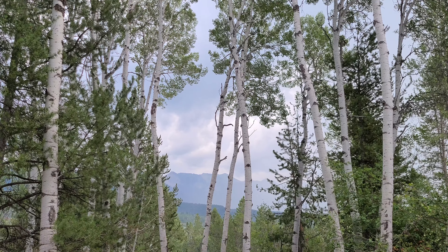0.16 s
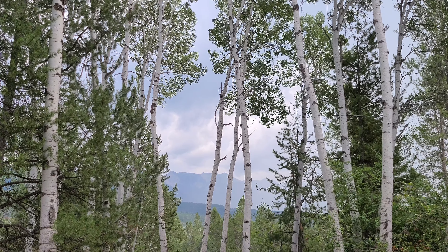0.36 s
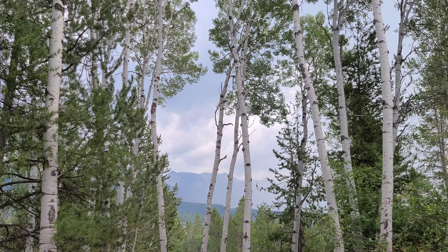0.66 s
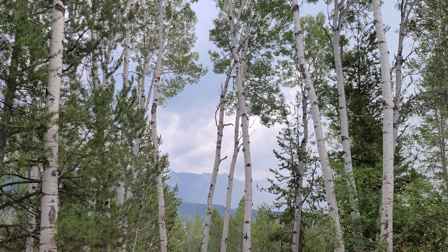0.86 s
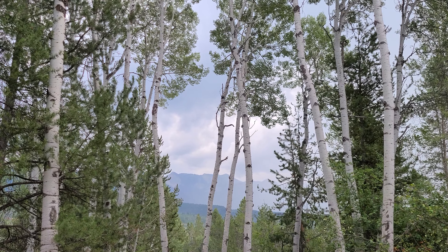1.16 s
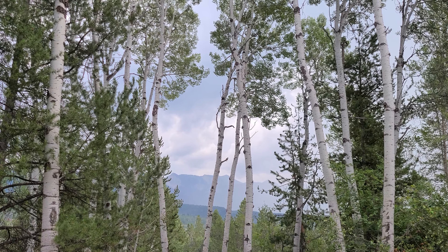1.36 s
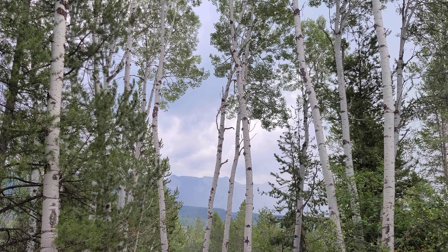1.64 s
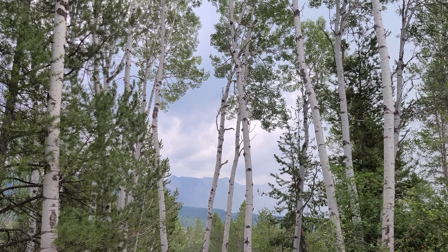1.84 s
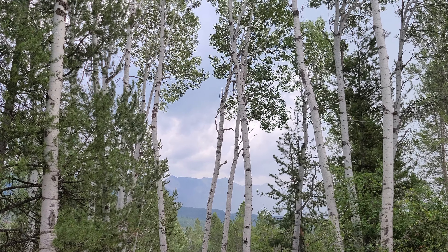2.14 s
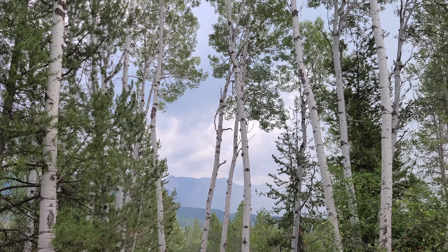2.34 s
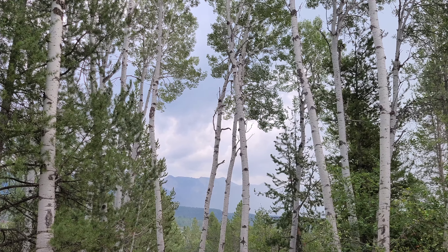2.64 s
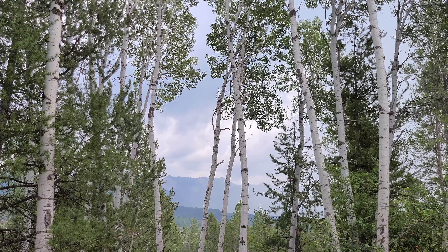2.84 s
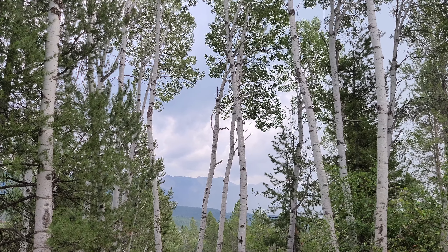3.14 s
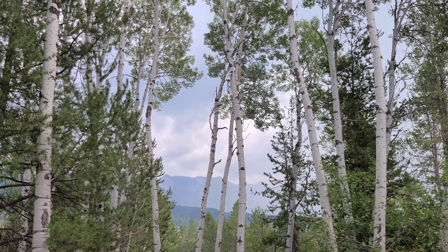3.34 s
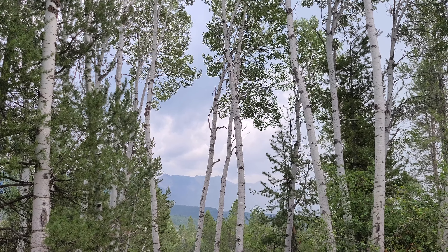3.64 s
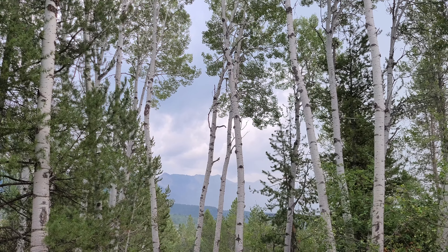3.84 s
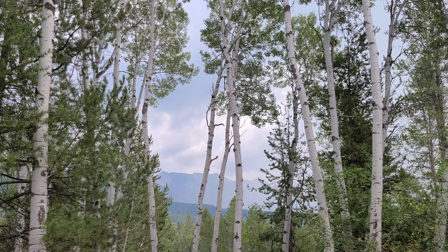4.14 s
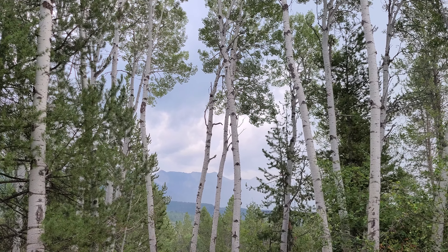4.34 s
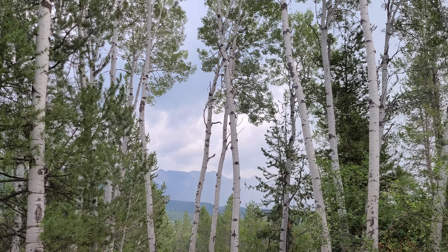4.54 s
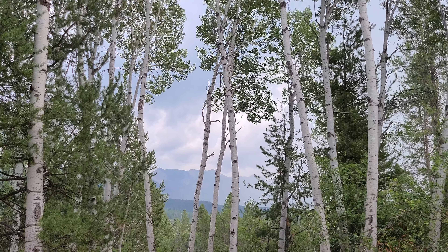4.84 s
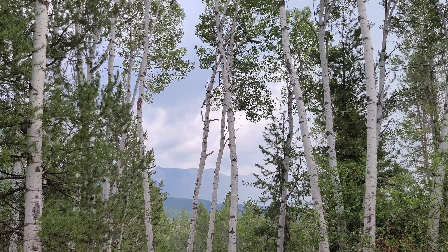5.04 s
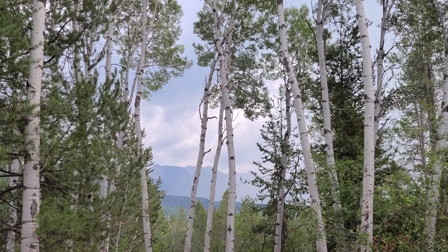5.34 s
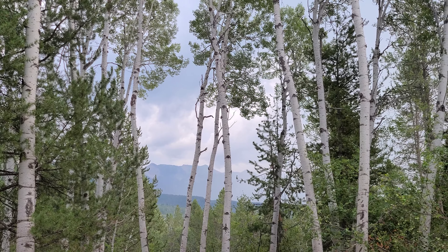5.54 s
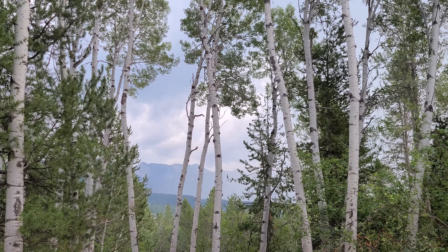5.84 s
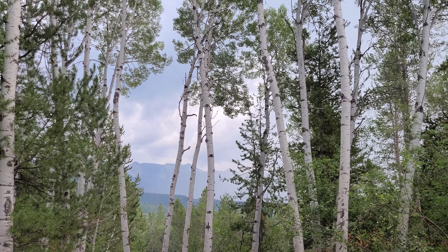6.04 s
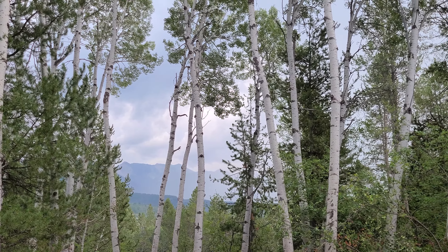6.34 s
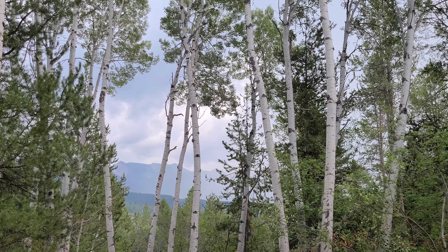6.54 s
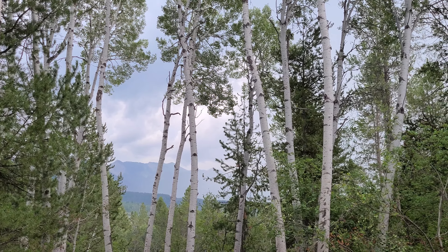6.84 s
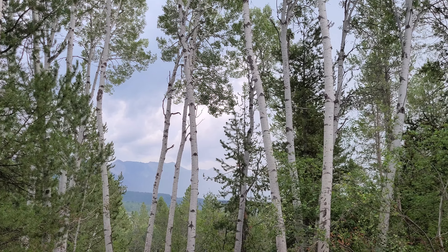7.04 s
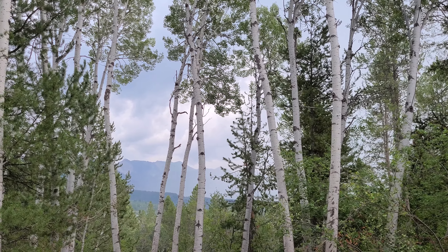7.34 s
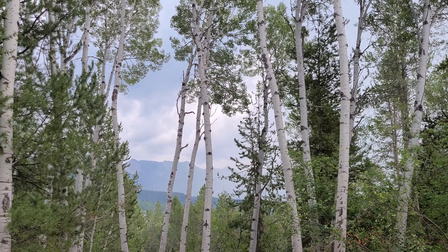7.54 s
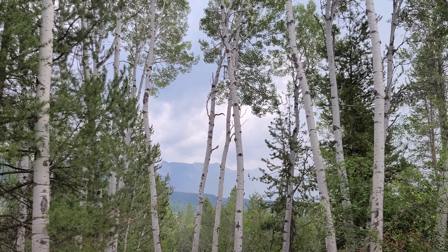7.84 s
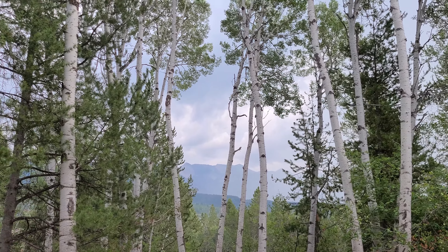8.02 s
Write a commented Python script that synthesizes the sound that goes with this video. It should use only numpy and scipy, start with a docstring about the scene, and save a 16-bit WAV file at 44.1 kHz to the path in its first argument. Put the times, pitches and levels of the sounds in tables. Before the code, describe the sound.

Outdoors in a wooded mountain valley, thunder is already rumbling. Close to the microphone something rubs quickly to and fro for about two seconds, with small rasping snags. The thunder builds into dull cracking claps, peaking around three seconds, sinks to a mutter, then swells again in a deeper, bassier peal before fading. Faint airy hiss lies behind, and the trees lend a short, diffuse echo.

```python
"""Distant thunder rolls over a mountain forest in two long peals, the first cracking, the second deep.
Shock waves from the crooked channel superpose into a steady rumble, surges and single claps,
each a crowd or train of filtered impulses, dulled by the air and scattered by the trees.
At first something rubs softly to and fro close to the microphone: impulses of stick-slip friction
drive resonances and a broad swish. Behind lies a quiet hiss of filtered noise."""
import sys
import numpy as np
from scipy import signal
from scipy.fft import rfft, irfft
from scipy.io import wavfile
from scipy.ndimage import uniform_filter1d, minimum_filter1d, map_coordinates

SR = 44100
rng = np.random.default_rng(int(sys.argv[2]) if len(sys.argv) > 2 else 0)


def to_wav(s):
    """Save 16-bit WAV."""
    ch = np.atleast_2d(s).T  # columns
    pcm = np.round(np.clip(ch, -1, 1) * 32767)  # PCM
    wavfile.write(sys.argv[1], SR, pcm.astype(np.int16))


N = 360738
TIME = np.arange(N) / SR  # s
FREQ = np.arange(N // 2 + 1) * SR / N  # Hz


def undb(db):
    """Logarithmic level: decibels to amplitude gain."""
    return 10 ** (np.asarray(db) / 20)


def unit(x):
    """Normalisation of power: scale to rms 1."""
    return x / np.sqrt(np.mean(x ** 2))


def curves(table):
    """Linear interpolation: the columns of a table, joined by straight lines in time."""
    s, *columns = np.transpose(table)
    return [np.interp(TIME, s, column) for column in columns]


def colour(x, points):
    """Minimum-phase filtering: a causal filter through (Hz, dB) points, from the cepstrum of its gain."""
    n = x.shape[-1]
    bin_hz = np.arange(n // 2 + 1) * SR / n
    hz, db = np.transpose(points)
    gain_db = np.interp(np.log(bin_hz + 1), np.log(hz), db)
    cepstrum = irfft(np.log(undb(gain_db)), n)
    # folding the cepstrum onto positive times makes the response causal
    cepstrum[1:n // 2] *= 2
    cepstrum[n // 2 + 1:] = 0
    return irfft(rfft(x) * np.exp(rfft(cepstrum)), n)


def split(x, hz, order=8):
    """Complementary filtering: the parts of x below and above hz add up to x."""
    n = x.shape[-1]
    bin_hz = np.arange(n // 2 + 1) * SR / n
    low = irfft(rfft(x) / (1 + (bin_hz / hz) ** order), n)
    return low, x - low


def registers(x):
    """Band division: bass, body and crack of a thunder sound, parted at 110 and 400 Hz."""
    bass, rest = split(x, 110)
    body, crack = split(rest, 400)
    return bass, body, crack


def resonance(hz, width_hz):
    """Resonance: response of a steep band-pass, gain near 1 at its centre."""
    detuning = (FREQ ** 2 - hz ** 2) / (0.72 * width_hz * FREQ + 1)
    return 1 / (1 + 1j * detuning) ** 2


def impulses(n, rate, spread_db):
    """Shot noise: randomly timed impulses of either sign, rate per second, sizes spread exponentially in dB."""
    size = undb(spread_db * np.minimum(rng.exponential(size=n), 4))
    present = rng.random(n) < rate / SR
    return present * rng.choice([-1, 1], n) * size


def running_rms(x, seconds):
    """Short-time power: level of x over a sliding, rounded window."""
    k = max(int(seconds * SR), 2)
    power = uniform_filter1d(uniform_filter1d(x ** 2, k), k)
    return np.sqrt(np.abs(power) + 1e-18)


def delay(x, ms):
    """Propagation delay: x heard ms later; the lag may move."""
    return map_coordinates(x, [np.arange(N) - ms * SR / 1000], order=3, mode="nearest")


def flutter(rate):
    """Random modulation: levels held 1 / rate s and slewed; rms near 1."""
    k = int(SR / rate)
    held = np.repeat(rng.standard_normal(N // k + 1), k)
    return unit(uniform_filter1d(held, k))[:N]


# rubbing strokes, to and fro, about three a second; levels before the trims in rubbing():
# (start [s], length [s], rasp level [dB], swish level [dB], thin ring level [dB])
STROKES = [(-0.2, 0.35, -58, -61.5, -76), (0.096, 0.34, -58, -59.5, -80), (0.44, 0.41, -57, -60.5, -64),
           (0.786, 0.31, -52, -58, -76), (1.132, 0.35, -50.5, -57, -55), (1.441, 0.28, -55.5, -58, -77),
           (1.76, 0.34, -62, -62, -64), (2.061, 0.31, -53.5, -56, -90)]
# snags, where the rubbed thing catches and rasps for a moment: (time [s], rasp level before trim [dB])
SNAGS = [(0.17, -52.5), (0.26, -48.5), (0.57, -56), (0.73, -55), (0.86, -58), (0.94, -57), (1.17, -60.5),
         (1.41, -61), (1.88, -53), (2.029, -56.5), (2.16, -45.5), (2.465, -68)]
SNAG_S = 0.016
# each part of the sound grows as this power of the stroke's speed
RASP_POWER, SWISH_POWER, RING_POWER = 2.5, 3, 6.3


def strokes(skew=0.97):
    """Velocity-dependent friction: each stroke speeds up from rest and slows, its gains powers of speed; snags add rasp."""
    speed, gains = np.zeros(N), np.zeros((3, N))
    powers = (RASP_POWER, SWISH_POWER, RING_POWER)
    for start_s, length_s, *levels_db in STROKES:
        along = (TIME - start_s) / length_s
        moving = (along > 0) & (along < 1)
        arc = np.sin(np.pi * along[moving] ** skew)
        speed[moving] += arc
        gains[:, moving] += [undb(db) * arc ** power for db, power in zip(levels_db, powers)]
    rasp, swish, ring = gains
    snags = sum(undb(db) * np.exp(-((TIME - s) / SNAG_S) ** 2) for s, db in SNAGS)
    return speed, np.hypot(rasp, snags), swish, ring


# resonances of the rubbed thing: (frequency [Hz], width [Hz], relative level [dB])
RASP_MODES = [(2574, 330, -0.5), (3054, 240, -2.5)]
SCRAPE_HZ, SCRAPE_WIDTH_HZ = 1640, 520
RING_HZ, RING_WIDTH_HZ = 10150, 250
# colour of a fast stroke: (frequency [Hz], relative level [dB])
SWISH_SPECTRUM = [(1200, -6.5), (2000, -4), (2600, 5), (3200, 11), (3560, -3), (4150, 1), (4850, -5),
                  (5230, -15.5), (5600, -3.5), (7000, -13), (7600, -17), (10000, -15.5), (12500, -25),
                  (15500, -19)]


def rubbing(lag_ms=0.436, stray_db=-3, rasp_stray_db=-12, catch_db=2.0, swap_db=1.5, brighten_db=6,
            rasp_trim_db=-1.0, swish_trim_db=5.5, scrape_db=4, ring_trim_db=-4.0):
    """Stick-slip friction: slips drive two resonances; mid-stroke opens into a swish, the way back has a thin ring."""
    speed, rasp_gain, swish_gain, ring_gain = strokes()
    catch = catch_db * flutter(110)
    # the contact wanders, so either resonance may take the lead; speed favours the upper one
    modes = []
    for k, (hz, width_hz, db) in enumerate(RASP_MODES):
        lead_db = swap_db * flutter(35) + k * brighten_db * (speed - 1)
        modes.append((resonance(hz, width_hz), db + lead_db))
    rasps, swishes = [], []
    # one sound common to both ports, then a stray one for each
    for _ in range(3):
        grains = rfft(impulses(N, rate=1900, spread_db=2.0))
        slips = rfft(impulses(N, rate=1200, spread_db=-0.5))
        rasp = sum(unit(irfft(slips * mode, N)) * undb(level_db) for mode, level_db in modes)
        rasp = rasp * rasp_gain * undb(rasp_trim_db + catch)
        # the fastest part of a stroke brings out the lower scrape
        scrape = unit(irfft(slips * resonance(SCRAPE_HZ, SCRAPE_WIDTH_HZ), N))
        scrape = scrape * speed ** 3.1 * swish_gain * undb(scrape_db)
        swish = unit(colour(irfft(grains, N), SWISH_SPECTRUM))
        swish = swish * swish_gain * undb(swish_trim_db + .5 * catch)
        ring = unit(irfft(grains * resonance(RING_HZ, RING_WIDTH_HZ), N))
        ring = ring * ring_gain * undb(ring_trim_db + catch)
        rasps.append(rasp + scrape)
        swishes.append(swish + ring)
    direct = rasps[0] + swishes[0]
    stray = undb(rasp_stray_db) * np.array(rasps[1:]) + undb(stray_db) * np.array(swishes[1:])
    return np.array([direct, delay(direct, lag_ms)]) + stray


# spectral density of still forest air: (frequency [Hz], relative level [dB per Hz])
AIR_SPECTRUM = [(650, -27), (1100, 0), (1260, -4.5), (1450, -2.5), (1570, -6), (1850, -9), (2000, -10.5),
                (2580, -15.5), (2850, -15), (3080, -17), (4590, -19.5), (4950, -22.5), (6610, -17),
                (8240, -26.5), (15500, -33.5)]
AIR_DB = -68  # rms of the hiss above 1500 Hz


def air():
    """Incoherent noise: a smooth far hiss, unrelated at the two ports."""
    hiss = colour(rng.standard_normal((2, N)), AIR_SPECTRUM)
    treble = split(hiss, 1500)[1]
    return hiss * undb(AIR_DB) / np.std(treble)


SURGE_ATTACK_S, SURGE_FALL_DB_PER_S = 0.016, 217


def surge(start_s, hold_s):
    """Exponential decay: a surge's envelope rises quickly, holds, then falls steadily in dB."""
    age = TIME - start_s
    rise = np.clip(age / SURGE_ATTACK_S + .5, 0, 1)
    return rise * undb(-SURGE_FALL_DB_PER_S * np.clip(age - hold_s, 0, 1))


# the rumble that lies under the whole roll: (time [s], body level before trim [dB])
ROLL = [(0, -30), (0.36, -37), (0.83, -38.5), (0.95, -24.5), (1.3, -26), (1.7, -42), (1.98, -34),
        (2.4, -31), (2.75, -25), (3.3, -29.5), (3.95, -37), (4.4, -40.5), (5.2, -38.5), (5.5, -25.5),
        (6.0, -25.5), (6.5, -39.5), (7.3, -39), (7.8, -45), (8.18, -46)]
# bass and crack of the rumble against its body; later sound has come further and is deeper
RUMBLE_BASS_DB, DEEPENING_DB_PER_S, RUMBLE_CRACK_DB = -2.5, 1.02, -10.5
# surges, each a bend of the channel heard as one crowd of shocks; levels before trim:
# (start [s], hold [s], body level [dB], bass level [dB], crack level [dB])
SURGES = [(0.067, 0.014, -43, -42, -48), (0.218, 0.036, -33, -28.5, -40.5),
          (0.4, 0.06, -33.5, -31.5, -43.5), (0.57, 0.14, -37, -34, -49), (0.85, 0.13, -24.5, -26.5, -39.5),
          (1.14, 0.14, -20, -27.5, -34.5), (1.488, 0.11, -20.5, -31.5, -33.5),
          (1.585, 0.094, -33.5, -23.5, -37), (1.724, 0.16, -30.5, -33.5, -39.5),
          (2.041, 0.032, -22, -27.5, -41.5), (2.139, 0.12, -27.5, -26, -44.5),
          (2.341, 0.19, -21, -25, -32.5), (2.487, 0.16, -20, -18.5, -29), (2.831, 0.054, -21, -30, -27.5),
          (2.912, 0.1, -17.5, -25.5, -29), (3.459, 0.12, -22, -26.5, -39), (3.603, 0.11, -30.5, -33, -61),
          (3.696, 0.15, -25, -34, -42), (4.003, 0.22, -39, -40, -46), (4.45, 0.14, -38.5, -49, -44.5),
          (4.689, 0.13, -32, -33, -47.5), (4.883, 0.036, -42, -41.5, -46), (5.112, 0.031, -29, -34, -44),
          (5.26, 0.055, -29, -23.5, -46.5), (5.399, 0.25, -20, -14.5, -36.5),
          (5.686, 0.2, -19.5, -16, -32.5), (6.105, 0.085, -27.5, -18, -49), (6.56, 0.18, -38, -38, -62),
          (6.92, 0.089, -37.5, -38, -51), (7.2, 0.18, -44.5, -52, -49), (7.4, 0.14, -39, -53, -46),
          (7.556, 0.042, -40.5, -36, -49)]


def roll_levels():
    """Energy addition: surges add their power to the rumble, giving the rms of bass, body and crack over time."""
    body_db, = curves(ROLL)
    bass_db = body_db + RUMBLE_BASS_DB + DEEPENING_DB_PER_S * TIME
    power = undb([bass_db, body_db, body_db + RUMBLE_CRACK_DB]) ** 2
    for start_s, hold_s, body, bass, crack in SURGES:
        power += np.outer(undb([bass, body, crack]) ** 2, surge(start_s, hold_s) ** 2)
    return np.sqrt(power)


# one shock from each branch of the channel, after its own way through the air and off the ground:
# (frequency [Hz], relative level [dB])
NEAR_BRANCH = [(12, -46.5), (20, -10), (54, -2), (92, -2.5), (173, 4), (272, -9.5), (332, -5.5), (383, -8),
               (443, -17.5), (512, -16.5), (603, -20.5), (821, -22), (1060, -38), (1220, -33.5),
               (1520, -42), (1980, -71), (3340, -120)]
MAIN_BRANCH = [(12, -39.5), (20, 2), (43, -4), (104, 1.5), (167, -2), (211, -11.5), (289, -3.5),
               (366, -18.5), (416, -7), (499, -21), (557, -17), (633, -24.5), (818, -28), (1370, -46),
               (1580, -55), (2050, -88), (3480, -120)]
FAR_BRANCH = [(12, -43), (20, -18), (49, -5), (70, -2), (91, -2.5), (143, -11), (243, -8.5), (302, -12),
              (360, -18), (405, -21), (447, -19.5), (555, -33), (717, -33), (1080, -48.5), (2200, -75.5),
              (2860, -106), (4840, -120)]
HILL_ECHO = [(12, -35.5), (20, -9.5), (59, -1), (106, -2.5), (157, -0.5), (237, -8), (278, -10.5),
             (350, -8.5), (449, -19), (499, -21), (652, -26.5), (725, -23.5), (947, -33), (1150, -48.5),
             (1400, -49), (1820, -76.5), (3080, -120)]
BRANCHES = [NEAR_BRANCH, MAIN_BRANCH, HILL_ECHO, FAR_BRANCH, HILL_ECHO]
# when one branch gives way to the next: (time [s])
HANDOVER = [2.25, 3.12, 5.2, 6.45]


def roll(trims_db=(-1.0, -1.0, -1.0), cycles=11, patchy_db=1.0):
    """Random superposition: a crowd of shocks from all along the channel swells and changes weight by branch."""
    crowd = impulses(N, rate=900, spread_db=1.0)
    branch = np.searchsorted(HANDOVER, TIME)
    shocks = np.zeros(N)
    for k, shape in enumerate(BRANCHES):
        fade = uniform_filter1d(1. * (branch == k), SR // 10)
        shocks += unit(colour(crowd, shape)) * fade
    # shocks add and cancel by chance; evening out over some cycles leaves the bass the slowest swings
    bass, body, crack = [part / running_rms(part, cycles / hz)
                         for part, hz in zip(registers(shocks), (70, 200, 400))]
    # the short waves come and go in patches on their way through restless air
    crack = crack * undb(patchy_db * flutter(24))
    parts = zip((bass, body, crack), roll_levels(), trims_db)
    return sum(part * level * undb(trim) for part, level, trim in parts)


# claps that stand out of the roll; levels are peaks of short-time rms before the trims in claps():
# (time less late_s [s], body level [dB], bass level [dB], crack level [dB])
CLAPS = [(0.073, -31, -22, -31.5), (0.225, -21, -26, -41), (0.429, -21, -36, -44.5),
         (0.504, -34, -42, -39.5), (0.597, -19, -41, -44.5), (0.852, -14, -23, -31.5),
         (0.896, -13, -22, -35), (1.029, -10.5, -28.5, -43), (1.149, -12.5, -16.5, -30.5),
         (1.204, -8, -22, -25.5), (1.258, -9.5, -25, -28), (1.426, -6, -36.5, -33.5),
         (1.488, -14, -28, -38.5), (1.517, -6, -27, -29.5), (1.573, -8.5, -15.5, -35),
         (1.814, -3.5, -32, -24.5), (1.875, -13.5, -27.5, -27), (2.353, -11.5, -23, -27),
         (2.375, -12, -23.5, -24.5), (2.428, -27.5, -12.5, -31.5), (2.492, -3, -7, -15.5),
         (2.517, -15.5, -12, -20.5), (2.592, -12.5, -12.5, -26), (2.626, -13, -20.5, -32.5),
         (2.904, -14, -13.5, -20.5), (2.938, -10, -17, -20), (2.983, -2.5, -19, -26),
         (3.003, -1.5, -19.5, -18.5), (3.194, -19.5, -21, -28.5), (3.433, -16, -23, -41),
         (3.511, -5.5, -20, -28), (3.733, -10.5, -31, -34.5), (3.836, -14, -16, -39.5),
         (4.054, -34, -30, -38.5), (4.107, -17.5, -27, -54), (4.151, -17, -22.5, -54),
         (4.282, -18.5, -40, -43), (4.477, -14, -48, -46), (4.751, -13, -31, -40),
         (5.251, -23.5, -21.5, -44), (5.382, -8.5, -25, -28.5), (5.454, -17, -8, -31),
         (5.505, -16.5, -6.5, -39), (5.562, -6, -10.5, -19.5), (5.619, -18.5, -19.5, -34),
         (5.766, -8.5, -14.5, -24), (5.829, -2, -10, -21.5), (6.083, -22.5, -25, -30.5),
         (6.147, -14, -8.5, -44), (6.199, -21, -9, -47), (6.623, -18.5, -32, -42.5), (6.937, -30, -34, -44),
         (6.968, -25, -32, -34)]


def claps(trims_db=(-2.5, -8.5, -3.0), late_s=0.002, train_s=0.014, front_gain=2.0, size=8192, lead=1024):
    """Simultaneous arrival: channel across the line of sight gives a steep front and a short train behind it."""
    out = np.zeros(N + 2 * size)
    age = np.maximum(np.arange(size) - lead, 0) / SR
    front = 1. * (np.arange(size) == lead)
    for s, body_db, bass_db, crack_db in CLAPS:
        branch = BRANCHES[np.searchsorted(HANDOVER, s)]
        train = impulses(size, rate=900, spread_db=2.0) * np.exp(-age / train_s) * (age > 0)
        _, body, crack = registers(colour(front_gain * front + train, branch))
        # in the long waves the whole train merges into one thud
        bass = registers(colour(front, branch))[0]
        start = max(int((s + late_s) * SR) - lead, 0)
        for part, db, trim in zip((bass, body, crack), (bass_db, body_db, crack_db), trims_db):
            out[start:start + size] += part / running_rms(part, 0.01).max() * undb(db + trim)
    return out[:N]


# time by which the right port hears the thunder first: (time [s], lag [ms])
BEARING = [(0, 0.1), (3, 0.11), (4.5, 0.22), (5.6, 0.35), (6.5, 0.27), (8.18, 0.13)]


def forest(x, t60_s=0.52, wet_db=-18.0):
    """Multiple scattering: the direct wave crosses two ports; trunks return mostly shorter waves from all sides."""
    lag_ms, = curves(BEARING)
    # left against right: the further to the right, the weaker at the left port
    left_db = -1.0 - 2 * lag_ms
    tails = rng.standard_normal((2, SR)) * np.exp(-np.log(1000) * TIME[:SR] / t60_s)
    tails /= np.sqrt(np.sum(tails ** 2, axis=1, keepdims=True))
    tails = colour(tails, [(40, -3.5), (150, -6.5), (300, -1), (600, 10.5), (1200, 9.5)])
    scattered = signal.fftconvolve(x[None], tails, axes=1)[:, :N]
    direct = np.array([delay(x, lag_ms) * undb(left_db / 2), x * undb(-left_db / 2)])
    return direct + undb(wet_db) * scattered


def thunder(onset_s=0.0017):
    """Linear superposition: roll and claps add and reach the listener through the trees."""
    onset = np.sin(np.pi / 2 * np.minimum(TIME / onset_s, 1)) ** 2
    return forest((roll() + claps()) * onset)


def scene(left_db=1.05):
    """Superposition of sources: thunder far off, rubbing close by, air; of the latter two the left gets more treble."""
    low, high = split(rubbing() + air(), 4500, order=4)
    return thunder() + low + high * undb(np.array([[left_db], [-left_db]]))


TOP_HZ = 15550


def record(dry):
    """Band limits and compression: the recorder drops deep bass, bends and limits the hardest shocks, cuts the top."""
    dry = signal.sosfilt(signal.butter(2, 27, "high", fs=SR, output="sos"), dry)
    # slightly flatter response beyond 0.55
    dry = dry - .07 * (dry - np.clip(dry, -.55, .55))
    # one smoothed gain for both ports, lowered just ahead of a peak above 0.92
    headroom = np.minimum(1, .92 / (np.abs(dry).max(axis=0) + 1e-9))
    gain = minimum_filter1d(headroom, size=600)
    gain = uniform_filter1d(uniform_filter1d(gain, size=300), size=300)
    return signal.sosfilt(signal.ellip(10, .1, 80, TOP_HZ, fs=SR, output="sos"), dry * gain)


dry = scene()
out = record(dry)
to_wav(out)
```